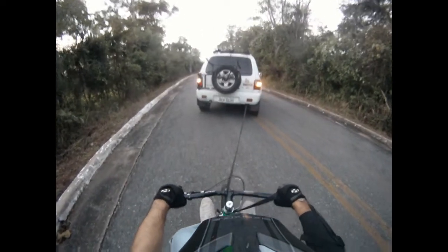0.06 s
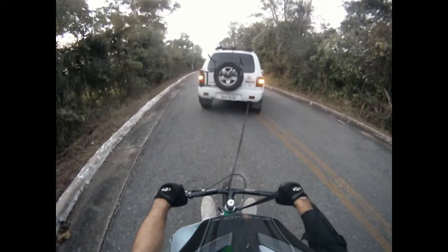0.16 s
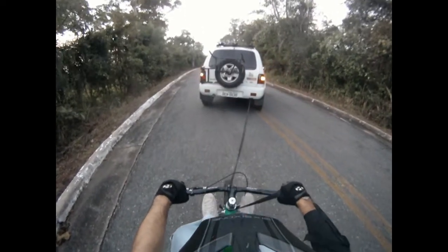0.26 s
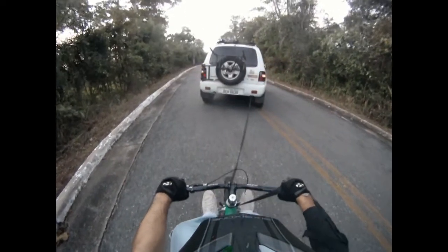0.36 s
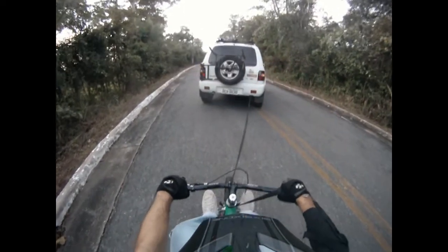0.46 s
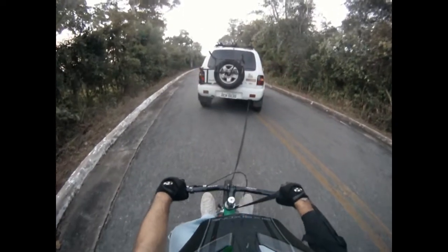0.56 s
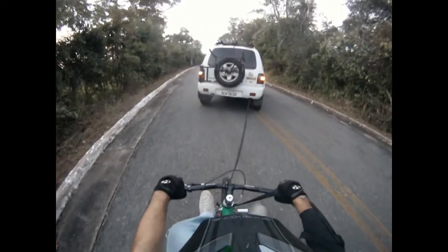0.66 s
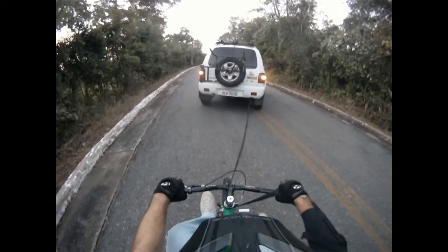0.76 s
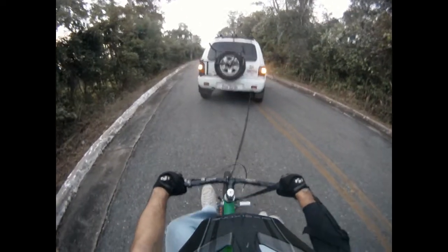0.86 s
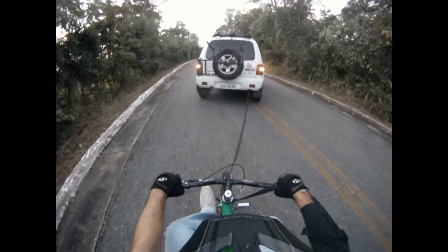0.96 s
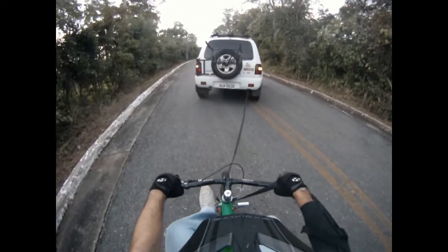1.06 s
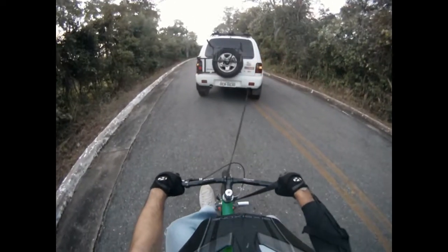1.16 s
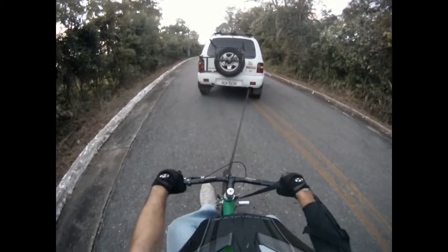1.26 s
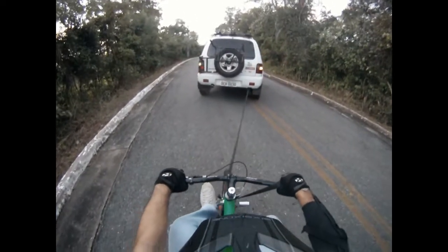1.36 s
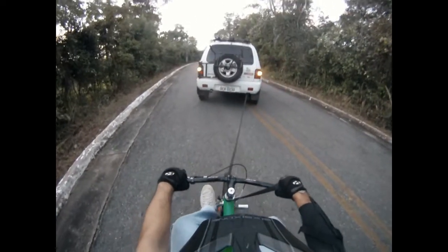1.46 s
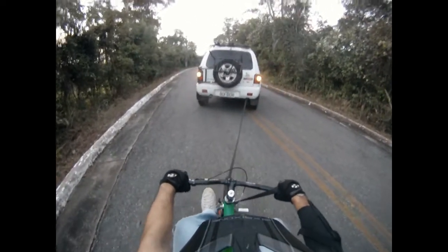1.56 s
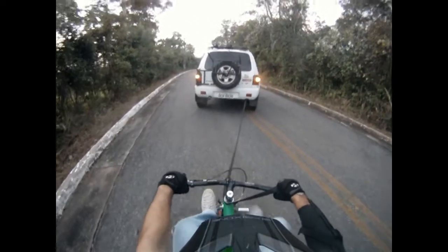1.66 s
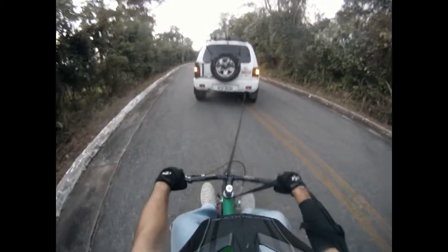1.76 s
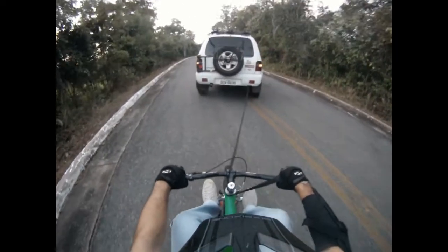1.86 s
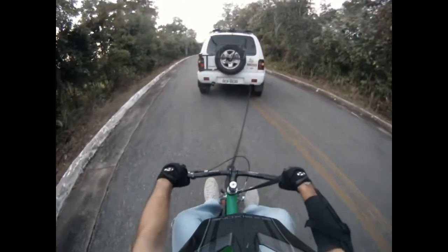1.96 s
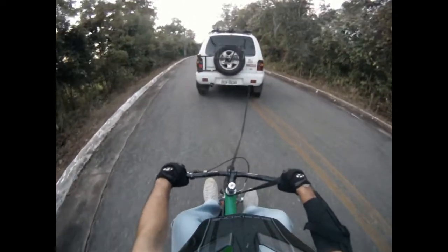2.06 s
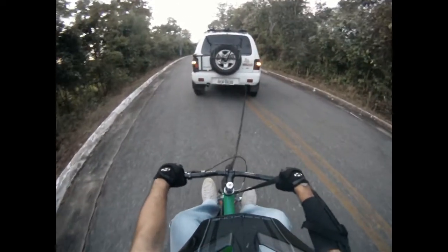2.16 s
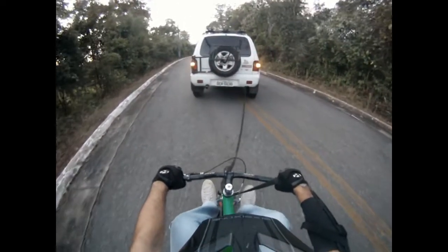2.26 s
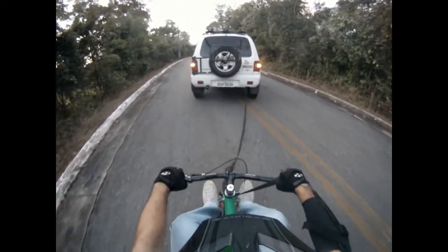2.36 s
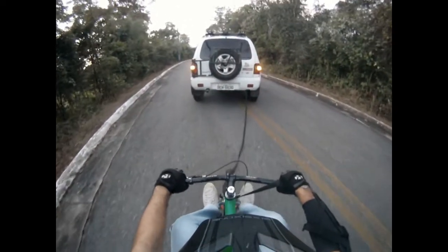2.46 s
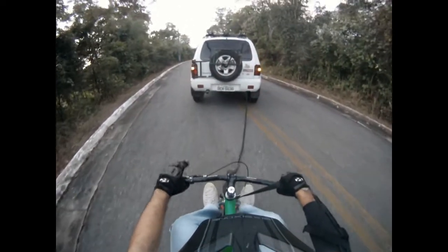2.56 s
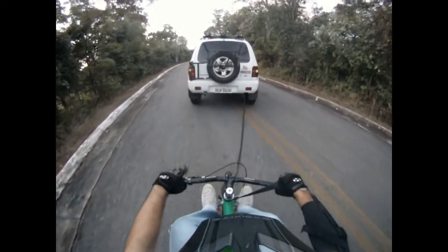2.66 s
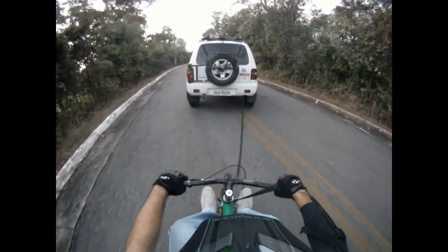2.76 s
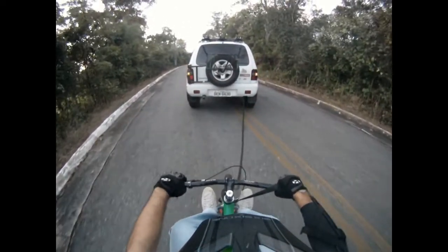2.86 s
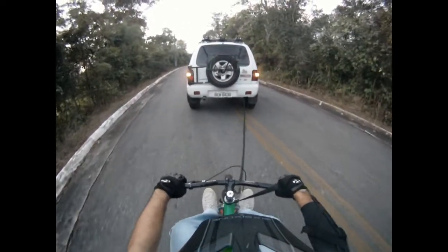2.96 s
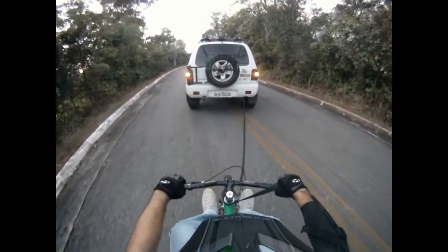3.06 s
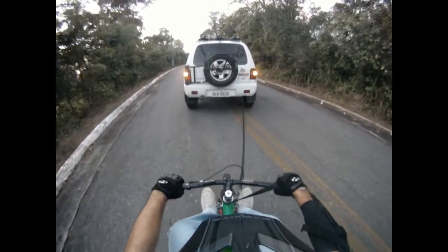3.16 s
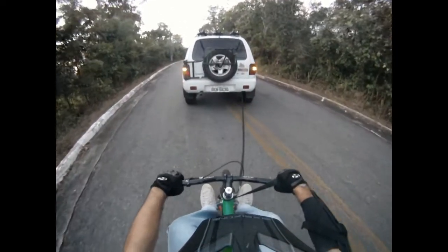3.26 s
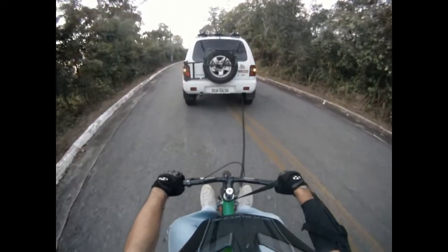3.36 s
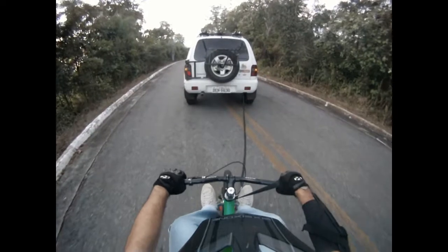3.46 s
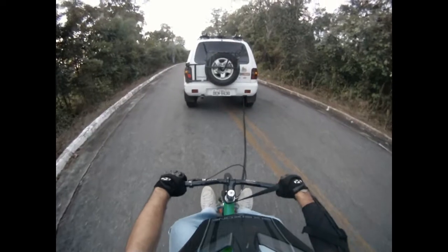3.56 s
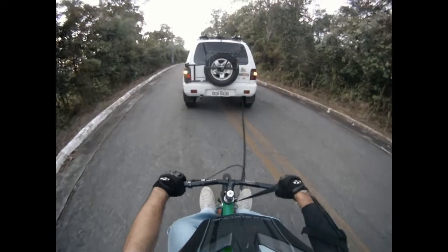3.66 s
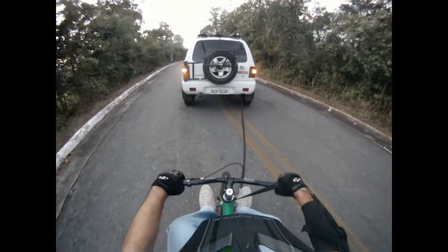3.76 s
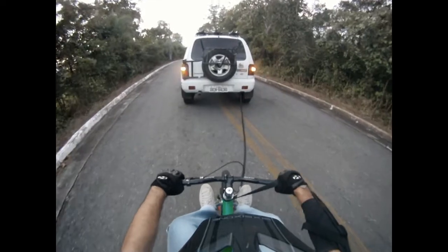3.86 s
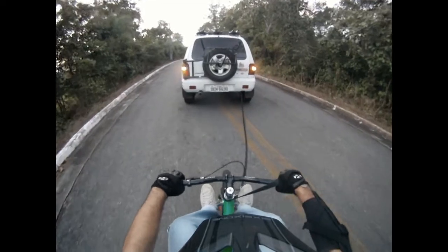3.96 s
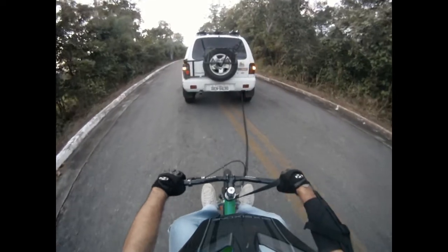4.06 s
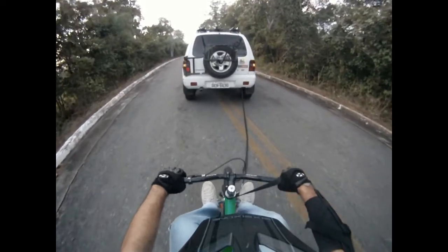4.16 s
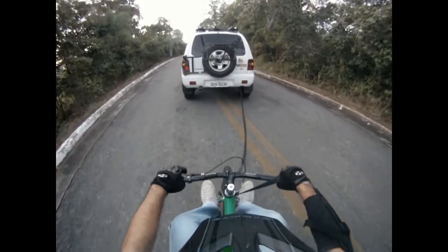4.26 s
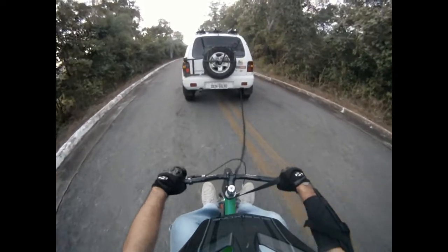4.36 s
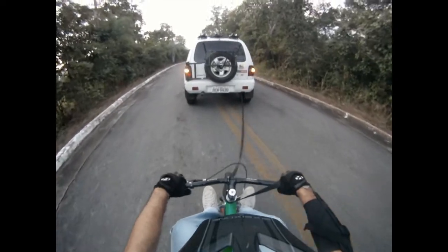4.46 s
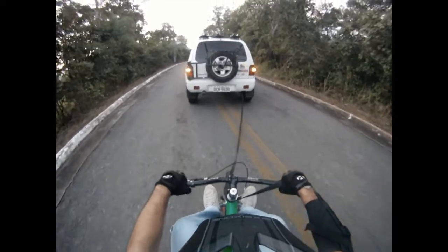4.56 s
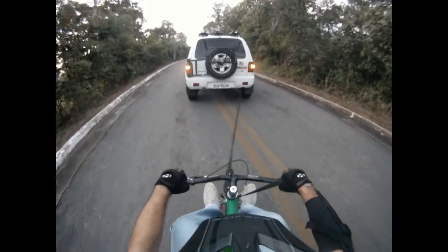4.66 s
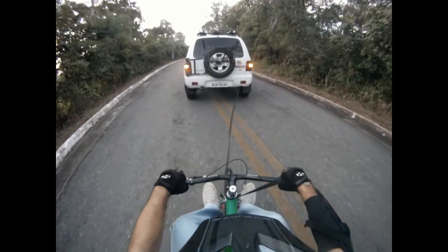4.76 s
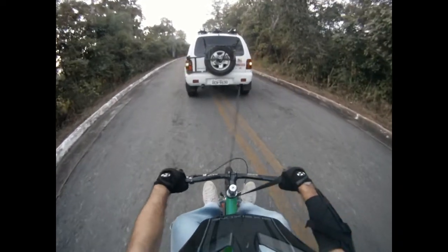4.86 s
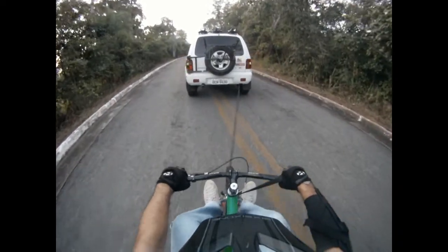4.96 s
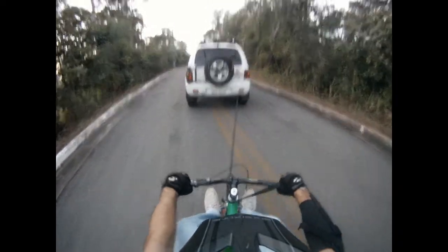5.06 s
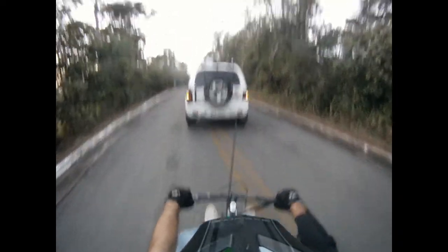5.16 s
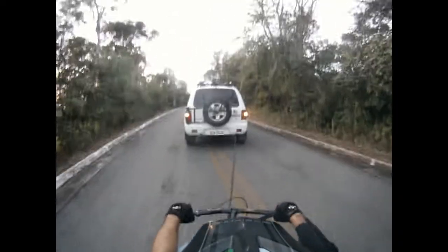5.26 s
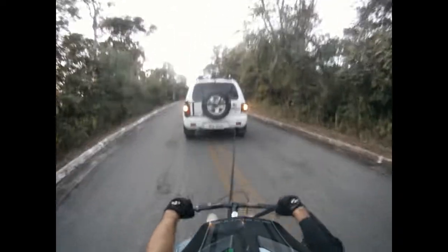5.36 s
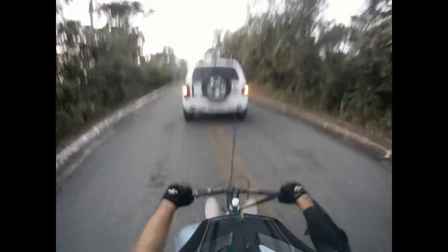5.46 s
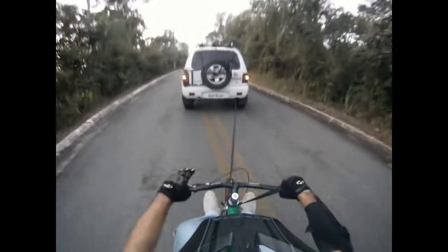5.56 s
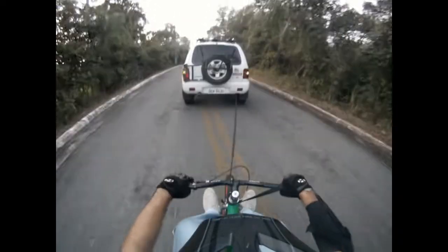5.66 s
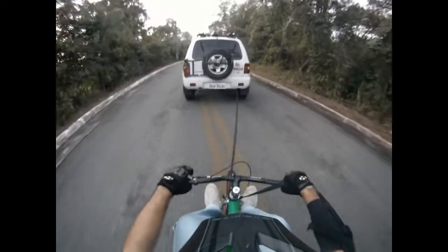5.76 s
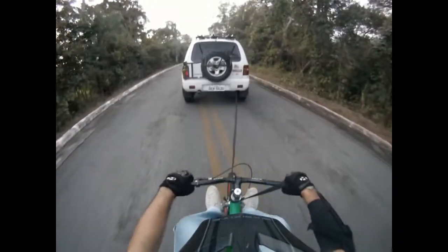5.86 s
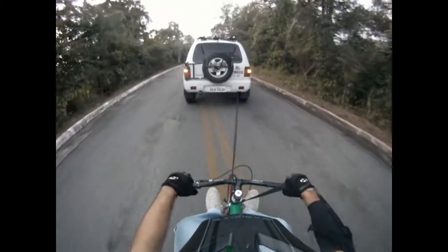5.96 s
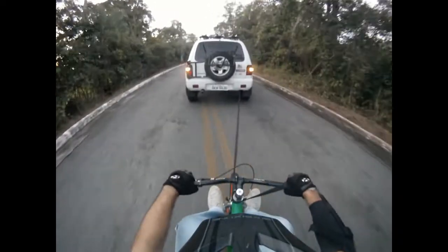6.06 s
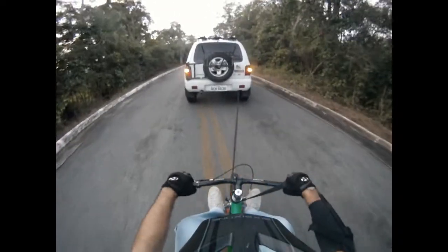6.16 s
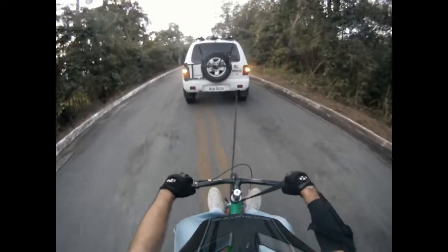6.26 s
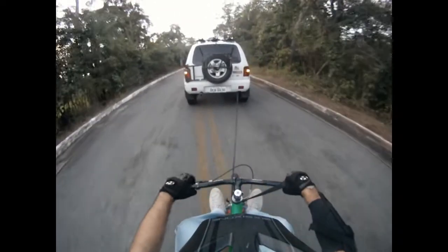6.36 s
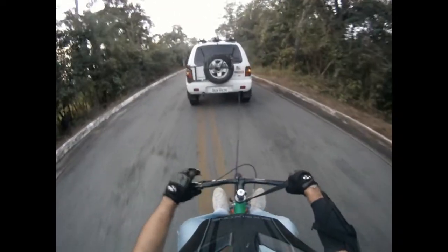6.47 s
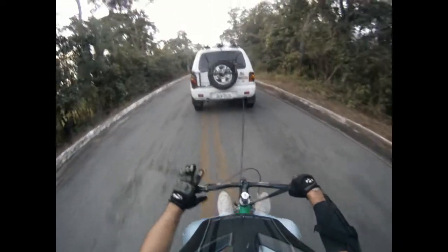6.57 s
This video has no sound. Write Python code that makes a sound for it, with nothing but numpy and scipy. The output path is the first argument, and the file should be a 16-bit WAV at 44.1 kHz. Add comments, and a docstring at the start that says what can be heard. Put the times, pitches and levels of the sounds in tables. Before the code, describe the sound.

A towed trike's quiet gritty roll, with sharp hollow plastic knocks and a pulling car engine, builds abruptly into rough, crackling wheel scrape and wind.

```python
"""A faint, dull knock on the camera case comes first, over the rasp of hard plastic wheels on gritty asphalt.
A drift trike is towed behind a car and heard from a cased camera on the rider: noise and ticks make the rasp.
Rough spots and knocks set off decaying rings; the engine is a stack of tones, the wind low noise.
Wind and rasp swell near the end, and the car's engine pulls ahead.
Harder knocks later overload a recorder whose coarse sampling mirrors the sound into the treble."""
import sys
import numpy as np
from scipy import signal
from scipy.fft import rfft, irfft, next_fast_len
from scipy.io import wavfile

SR = 44100
rng = np.random.default_rng(int(sys.argv[2]) if len(sys.argv) > 2 else 0)


def master_out(mix):
    """Clip the mix to full scale and print it as 16-bit PCM to the path in sys.argv[1]."""
    frames = np.transpose(np.atleast_2d(mix))
    ceiling = np.clip(frames, -1, 1)
    pcm = np.round(ceiling * 32767).astype(np.int16)
    wavfile.write(sys.argv[1], SR, pcm)


N = 291501
TIME = np.arange(N) / SR  # [s]

# Wheel rasp, growing with speed and coarser asphalt, before trims: (time [s], level [dB])
RASP_LEVEL = [(0, -62.5), (0.6, -60), (1.45, -61), (1.8, -59.5), (3.15, -58), (3.5, -54), (4.9, -57.5),
              (5.25, -50), (5.31, -55), (5.385, -58), (5.42, -46), (5.9, -47), (6.15, -41.5), (6.61, -43.5)]
# How hard the wheels scrub: (time [s], share [0-1])
SCRUB_SHARE = [(0, 0.01), (5.1, 0.02), (5.36, 0.8), (5.47, 0.47), (6.6, 0.85)]
# Colour of the wheels rolling freely: (frequency [Hz], relative density [dB per Hz])
ROLLING_COLOUR = [(300, -11), (600, -12), (1000, -14), (1200, -10.5), (1360, -10), (1850, -2), (2150, -0.5),
                  (2600, -4.5), (2850, -11.5), (3400, -7), (3720, -1.5), (4200, -17.5), (5000, -13),
                  (5800, -18)]
# Colour of the wheels scrubbing: (frequency [Hz], relative density [dB per Hz])
SCRUBBING_COLOUR = [(300, -11), (600, -13.5), (900, -24.5), (1080, -15), (1200, 3), (1400, -23.5),
                    (1800, -1), (2200, -6), (2850, -20), (3100, -6), (3850, -19), (4150, -26.5),
                    (4700, -18.5), (5700, -13.5)]
# Sharper grains that crackle while scrubbing: (frequency [Hz], relative level [dB])
CRACKLE_TONES = [(1200, 2.5), (1750, 6.5), (1900, -7), (2100, -16), (2280, -4), (3050, 4.5), (3300, -14),
                 (3600, -16), (3870, -2.5)]
# Ring of the plastic wheels and frame: (frequency [Hz], width of one filter pass [Hz], level [dB])
WHEEL_RINGS = [(1210, 210, -5.5), (1740, 330, -14), (1869, 122, 14), (2124, 222, 18.5), (2387, 300, 3),
               (2980, 290, -10), (3730, 970, -2)]
# Roughest spots of the road: (time [s], strength before trim [dB], upper ring against lower [dB])
ROUGHEST_SPOTS = [(0.546, -38, -19), (2.088, -34.5, -11.5), (2.221, -32.5, 4), (2.251, -37, 8),
                  (2.491, -33.5, -7), (2.517, -28.5, 8), (2.773, -36.5, -4), (2.895, -34.5, -1),
                  (3.109, -34, -13), (3.468, -34.5, -14), (3.54, -36.5, 4), (4.92, -31, -11),
                  (5.015, -32.5, 6), (5.116, -31, 9.5), (5.18, -30.5, 0), (5.453, -23, -3.5),
                  (5.491, -32, 6), (5.634, -31.5, -2), (5.685, -25, 13), (5.734, -22, 7), (5.793, -27, -1),
                  (5.892, -28, 3), (5.936, -24, -6), (5.97, -23, 0), (6.05, -22, -9), (6.125, -21.5, 7),
                  (6.195, -24.5, -9), (6.376, -22.5, 3), (6.417, -12.5, -13), (6.451, -18, -26),
                  (6.494, -24, -10), (6.559, -17.5, -28), (6.588, -18.5, -24)]
# Lesser rough spots come by chance, more often while the wheels scrub
SPOTS_ROLLING_PER_S, SPOTS_SCRUBBING_PER_S = 4, 16
SPOTS_OVER_RASP_DB, SPOTS_SPREAD_DB, SPOTS_UPPER_DB = 16, 2.5, -1.5
# Knocks on the camera case, weight, crack and snap apart from level:
# (time [s], level [dB], buzz length [s], buzz [Hz], weight [dB], crack [dB], snap [dB])
CASE_KNOCKS = [(0.0474, -23, 0.0035, 1906, -29.5, -57, -62), (0.9877, -2.5, 0.0034, 1984, -30.5, -27, -19),
               (1.6795, -0.5, 0.0033, 1955, -23, -21, -34), (1.8400, -7.5, 0.0038, 1950, -25, -35, -50),
               (5.2653, 1.5, 0.0035, 1924, -20.5, -22.5, -30), (5.2830, 6.5, 0.004, 1951, -37.5, -1, -12),
               (5.5638, 4, 0.0024, 2215, -15, -6, -3), (5.5667, -4.5, 0.0012, 2320, -46, -8, -16),
               (5.5895, -20.5, 0.0034, 2120, -37, -28, -40)]
# Ring of the case: (frequency [Hz], level [dB], t60 [s])
CASE_RINGS = [(729, -32.5, 0.009), (1048, -15.5, 0.031), (1250, -12, 0.024), (1411, -18, 0.019),
              (1837, -10, 0.027), (2300, -42.5, .016), (2520, -58.5, 0.012), (2720, -28.5, .008),
              (3430, -44.5, 0.0058)]
# Colour of the case's clack: (frequency [Hz], relative density [dB per Hz])
CLACK_COLOUR = [(200, -33.5), (500, -25), (800, 19), (1100, -4.5), (1550, 13.5), (1900, -60), (2400, -20),
                (3000, 3), (3700, -22.5), (5000, -79.5)]
# Colour of the crack of a hard blow: (frequency [Hz], relative density [dB per Hz])
CRACK_COLOUR = [(60, 0.5), (300, -8.5), (480, -10), (650, -7), (950, -7.5), (1250, 18.5), (1550, 1.5),
                (2350, 14), (3000, -17), (3700, 19.5), (4500, -21), (5800, -44)]
# How strongly the road shakes rider and camera, before trim: (time [s], level [dB])
SHAKE_LEVEL = [(0, -47), (0.42, -54.5), (0.62, -44.5), (0.98, -40.5), (1.15, -60), (1.5, -61),
               (1.68, -42.5), (2.6, -33), (2.8, -38), (3.33, -38.5), (3.5, -28.5), (3.68, -38),
               (4.2, -40.5), (5.4, -33), (5.55, -38.5), (5.61, -24.5), (5.8, -40), (6.4, -33)]
# A faint squeak
SQUEAK_AT_S, SQUEAK_LENGTH_S, SQUEAK_HZ, SQUEAK_DB = 4.15, 0.17, 728, -61.5
# Towing car idles, pulls away, eases off, pulls again: (time [s], crank turns [Hz], level before trim [dB])
ENGINE_PACE = [(0, 28.6, -71.5), (3.17, 28.52, -62.5), (3.5, 37.77, -55.5), (3.8, 41.3, -57),
               (4.3, 42.13, -58), (5.5, 38.58, -58.5), (6.1, 38.9, -61), (6.6, 43.37, -52)]
# Multiples of the crank rate in the engine's hum: (multiple [-], relative level [dB])
ENGINE_HARMONICS = [(2, -1.5), (3, -0.5), (4, -2), (5, -3.5), (6, -7.5), (7, -15), (8, -28.5)]
# Colour of the wind while rolling: (frequency [Hz], relative density [dB per Hz])
BREEZE_COLOUR = [(10, -10), (30, 12.5), (50, 9), (70, 0), (115, -5), (155, 2.5), (220, -5), (320, -10.5),
                 (500, -17.5), (1000, -17), (3000, -66.5)]
# Colour of the wind while scrubbing: (frequency [Hz], relative density [dB per Hz])
GUST_COLOUR = [(10, -30), (30, -10), (50, -1), (70, -6), (110, -1), (170, -1.5), (280, 1), (350, -5.5),
               (520, -14), (900, -28), (3000, -59.5)]
# The recorder's coarse sampling rate and its final band limit
HOLD_HZ, EDGE_HZ = 12000, 15600


def rasp(grit_per_s=900, grit_spread_db=4, grit_db=-3, flutter_db=1.53, level_db=1.5, scrub_db=-2):
    """Fine asphalt hisses under the wheels, and single stones tick in it."""
    hiss = rng.standard_normal(N)
    stones = gain_of(grit_db) * grit(grit_per_s, grit_spread_db, size=N)
    db = follow(RASP_LEVEL)[0] + level_db + scrub_db * follow(SCRUB_SHARE)[0]
    db = db + flutter_db * drift(rate_hz=85)
    return blend(hiss + stones, ROLLING_COLOUR, SCRUBBING_COLOUR) * gain_of(db)


def crackle(per_s=70, spread_db=5, t60=0.01, level_db=-2):
    """Single stones flick off the scrubbing wheels, each with a short ring of its own."""
    t = np.arange(SR // 40) / SR
    ticks = np.zeros(N)
    for hz, db in CRACKLE_TONES:
        ring = gain_of(db - 60 * t / t60) * t * np.sin(2 * np.pi * hz * t)
        ticks += signal.oaconvolve(grit(per_s, spread_db, size=N), ring)[:N]
    return evened(ticks) * follow(SCRUB_SHARE)[0] * gain_of(follow(RASP_LEVEL)[0] + level_db)


def bumps(t60=0.096, rise_s=0.0035, level_db=-6, scrape_db=-6, grit_per_s=3000, grit_spread_db=2):
    """Each rough spot sets off a short gritty chatter that rings the wheels and swells their scrape."""
    out, scrape_force = np.zeros(N), np.zeros(N)
    t = np.arange(SR // 8) / SR
    chatter = grit(grit_per_s, grit_spread_db, size=N)
    rings = [gain_of(db) * resonate(chatter, hz, width, passes=2) for hz, width, db in WHEEL_RINGS]
    lower, upper = sum(rings[:3]), sum(rings[3:])
    for s, db, upper_db in ROUGHEST_SPOTS + rough_spots(count=120):
        force = (1 - np.exp(-t / rise_s)) * gain_of(db + level_db - 60 * t / t60)
        during = (round(s * SR) + np.arange(len(t))) % N
        ring = lower[during] + gain_of(upper_db) * upper[during]
        add(out, s, evened(ring) * force)
        add(scrape_force, s, force)
    scrape = blend(chatter, ROLLING_COLOUR, SCRUBBING_COLOUR)
    return out + gain_of(scrape_db) * scrape_force * scrape


def rough_spots(count):
    """Lesser rough spots scattered by chance along the road: rows like those of ROUGHEST_SPOTS."""
    place, chance, size = rng.random((count, 3)).T
    at = (place * N).astype(int)
    more_per_s = SPOTS_SCRUBBING_PER_S - SPOTS_ROLLING_PER_S
    per_s = SPOTS_ROLLING_PER_S + more_per_s * follow(SCRUB_SHARE)[0][at]
    db = follow(RASP_LEVEL)[0][at] + SPOTS_OVER_RASP_DB + SPOTS_SPREAD_DB * (2 * size - 1)
    met = chance < per_s * N / SR / count
    return [(s, level, SPOTS_UPPER_DB) for s, level in zip(TIME[at][met], db[met])]


def knocks(ring_rise_s=0.00026, thump_hz=74, thump_t60=0.047, thump_rise_s=0.011, thump_level_db=6,
           crack_t60=0.017, clack_db=-34, clack_t60=0.076, push_s=0.00031,
           hollow_hz=640, hollow_s=0.00043, snap_hz=3300, snap_s=0.00029,
           hollow_db=5, push_by_weight_db=-6, push_by_crack_db=-6):
    """The struck case buzzes for a few cycles, clacks and rings over a dull thump; hard blows also crack."""
    out, t = np.zeros(N), np.arange(SR // 10) / SR
    onset = 1 - np.exp(-t / ring_rise_s)
    ring = np.zeros(len(t))
    for k, (hz, db, t60) in enumerate(CASE_RINGS):
        # neighbouring rings start in opposite directions
        ring += (-1) ** k * onset * gain_of(db - 60 * t / t60) * np.sin(2 * np.pi * hz * t)
    thump_swell = (1 - np.exp(-t / thump_rise_s)) * gain_of(thump_level_db - 60 * t / thump_t60)
    thump = thump_swell * np.sin(2 * np.pi * thump_hz * t)

    def pulse(swell_s, hz):
        """The wall gives way: a short pulse whose envelope peaks at swell_s, with a tone inside."""
        return t / swell_s * np.exp(1 - t / swell_s) * np.cos(2 * np.pi * hz * t)

    def burst(points, db, t60):
        """A fading burst of coloured noise."""
        return evened(colour(rng.standard_normal(len(t)), points)) * onset * gain_of(db - 60 * t / t60)

    push, hollow, snap = pulse(push_s, 0), pulse(hollow_s, hollow_hz), pulse(snap_s, snap_hz)
    for s, db, length, buzz_hz, weight_db, crack_db, snap_db in CASE_KNOCKS:
        buzz = np.sin(np.pi * np.minimum(t / length, 1)) * np.sin(2 * np.pi * buzz_hz * t)
        clack = burst(CLACK_COLOUR, clack_db, clack_t60)
        crack = burst(CRACK_COLOUR, crack_db, crack_t60)
        # heavy blows sound hollow and thump, sharp ones snap
        give = gain_of(weight_db + push_by_weight_db) + gain_of(crack_db + push_by_crack_db)
        wall = give * push + gain_of(weight_db + hollow_db) * hollow + gain_of(snap_db) * snap
        struck = gain_of(db) * (buzz + ring + clack)
        add(out, s, struck + crack + wall - gain_of(weight_db) * thump)
    return out


def shake(sway_hz=28.1, width_hz=17, rattle_hz=38, rattle_db=-13, level_db=-1):
    """The uneven road sets the unsprung frame swinging in short lurches, which shake the camera."""
    road = rng.standard_normal((2, N))
    sway = evened(resonate(road[0], sway_hz, width_hz, passes=3))
    judder = evened(resonate(road[1], rattle_hz, width_hz, passes=3))
    return evened(sway + gain_of(rattle_db) * judder) * gain_of(follow(SHAKE_LEVEL)[0] + level_db)


def squeak(waver=0.0096, arch_hz=12, late=2.0):
    """One thin, unsteady tone that swells slowly and stops quickly, its pitch a shallow arch."""
    along = np.clip((TIME - SQUEAK_AT_S) / SQUEAK_LENGTH_S, 0, 1)
    hz = (SQUEAK_HZ + arch_hz * np.sin(np.pi * along)) * (1 + waver * drift(rate_hz=63))
    tone = evened(np.sin(2 * np.pi * np.cumsum(hz) / SR))
    return tone * gain_of(SQUEAK_DB) * np.sin(np.pi * along ** late)


def engine(waver=0.0015, throb_db=1.4, level_db=2):
    """Low multiples of the car's crank rate, each throbbing on its own, follow the pull of the engine."""
    hz, db = follow(ENGINE_PACE)
    turns = np.cumsum(hz * (1 + waver * drift(rate_hz=11))) / SR
    hum = np.zeros(N)
    for multiple, order_db in ENGINE_HARMONICS:
        throb = gain_of(order_db + throb_db * drift(rate_hz=8.9))
        hum += throb * np.sin(2 * np.pi * (round(multiple) * turns + rng.random()))
    return evened(hum) * gain_of(db + level_db)


def wind(buffet_db=2, level_db=-57, growth=0.071, gust_db=10):
    """Lumpy low turbulence that grows with the pace of the ride and widens as it grows."""
    pace_db = follow(RASP_LEVEL)[0] - RASP_LEVEL[0][1]  # the rasp stands for the pace
    db = level_db + growth * pace_db + gust_db * follow(SCRUB_SHARE)[0]
    turbulence = blend(rng.standard_normal(N), BREEZE_COLOUR, GUST_COLOUR)
    return turbulence * gain_of(db + buffet_db * drift(rate_hz=26))


def grit(per_s, spread_db, size):
    """Sparse ticks of stones, mostly small, a few large, evened to rms 1."""
    place, weight, side, chance = rng.random((4, size // 8))
    hit = chance < per_s * size / SR / len(chance)
    ticks = np.sign(side - .5) * (weight + .04) ** (-spread_db / 10) * hit
    return evened(np.bincount((place * size).astype(int), ticks, size))


def blend(x, calm, hard):
    """Crossfades x between two colours as the wheels scrub harder."""
    share = np.clip(follow(SCRUB_SHARE)[0], 0, 1)
    return np.sqrt(1 - share) * evened(colour(x, calm)) + np.sqrt(share) * evened(colour(x, hard))


def colour(x, points):
    """Causal, minimum-phase filter with the given spectrum."""
    hz, db = np.transpose(points)
    bins_hz = abs(np.fft.fftfreq(4096, 1 / SR))
    log_gain = np.log(gain_of(np.interp(np.log(bins_hz + 1), np.log(hz), db)))
    # the Hilbert transform of the log gain gives the phase
    response = np.fft.ifft(np.exp(np.conj(signal.hilbert(log_gain)))).real
    return signal.oaconvolve(x, response[:len(response) // 2])[:len(x)]


def resonate(x, hz, width, passes):
    """A resonance of peak gain 1, sharpened by repeated passes."""
    for _ in range(passes):
        x = signal.lfilter(*signal.iirpeak(hz, hz / width, fs=SR), x)
    return x


def drift(rate_hz, count=4096):
    """Random wander scaled to rms 1, its faster movement fading out around the given rate."""
    s = np.linspace(0, N / SR, count)
    rolloff = (1 + (np.fft.rfftfreq(count, s[1]) / rate_hz) ** 2) ** 2
    slow = irfft(rfft(rng.standard_normal(count)) / rolloff)
    return np.interp(TIME, s, evened(slow))


def follow(rows):
    """Each column of a time curve, at every sample."""
    s, *columns = np.transpose(rows)
    return [np.interp(TIME, s, column) for column in columns]


def gain_of(db):
    """Decibels to amplitude."""
    return 10 ** (np.asarray(db) / 20)


def evened(x):
    """Scales to rms 1."""
    return x / np.sqrt(np.mean(x ** 2) + 1e-20)


def add(mix, s, sound):
    """Lays a sound into the mix at time s."""
    part = mix[max(round(s * SR), 0):][:len(sound)]
    part += sound[:len(part)]


def scene():
    """Everything reaches one microphone in the open air."""
    mono = rasp() + crackle() + bumps() + knocks() + shake() + squeak() + engine() + wind()
    return np.array([mono, mono])


def duck(x, limit_db=-14, strength=4, recover_db_per_s=90, sense_s=0.048, close_s=0.014):
    """Sluggish gain control: a run of loud knocks turns the sound down for a moment."""
    def lag(v, seconds):
        """One-pole smoothing."""
        r = np.exp(-1 / (seconds * SR))
        return signal.lfilter([1 - r], [1, -r], v)
    power_db = 10 * np.log10(lag(np.mean(x ** 2, 0), sense_s) + 1e-12)
    # the reduction recovers from each peak at a steady rate
    fall = TIME * recover_db_per_s
    over_db = np.maximum.accumulate(strength * np.maximum(power_db - limit_db, 0) + fall) - fall
    return x * gain_of(-lag(over_db, close_s))


def record(dry):
    """Held coarse samples mirror the sound; overload, gain control and a band limit follow, in mono."""
    low_pass = signal.firwin(301, HOLD_HZ / 2 - 150, fs=SR)[None]
    narrow = signal.oaconvolve(dry[:1], low_pass, "same")
    # coarse sampling mirrors the sound around its rate, and holding each sample dulls it
    mirrored = narrow * (1 + 2 * np.cos(2 * np.pi * HOLD_HZ * TIME))
    size = next_fast_len(N)
    hold_response = np.sinc(np.fft.rfftfreq(size, 1 / SR) / HOLD_HZ)
    held = irfft(rfft(mirrored, size) * hold_response, size)[:, :N]
    clipped = np.clip(held, -.95, .95)
    band_limit = signal.firwin(301, EDGE_HZ, window=("kaiser", 9), fs=SR)[None]
    mono = signal.oaconvolve(duck(clipped), band_limit, "same")
    return np.vstack([mono, mono])


dry = scene()
out = record(dry)
master_out(out)
```